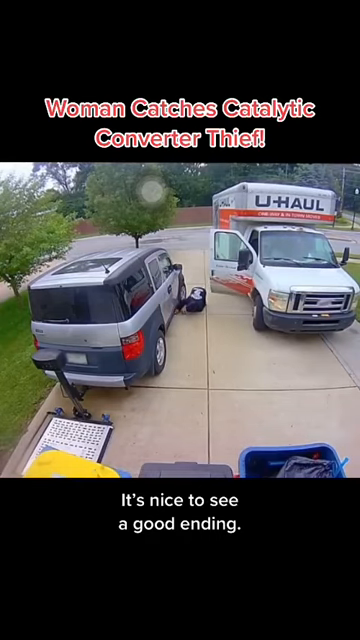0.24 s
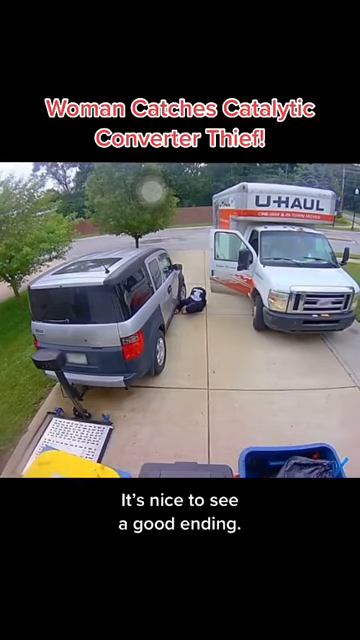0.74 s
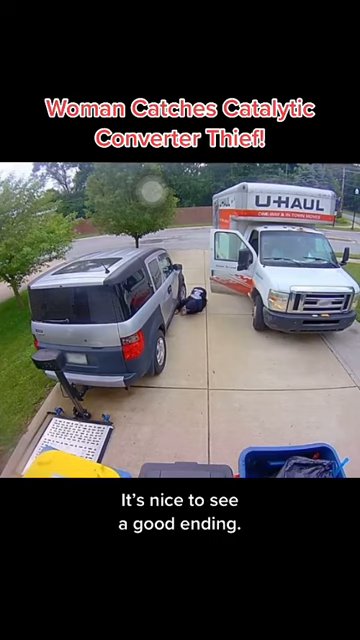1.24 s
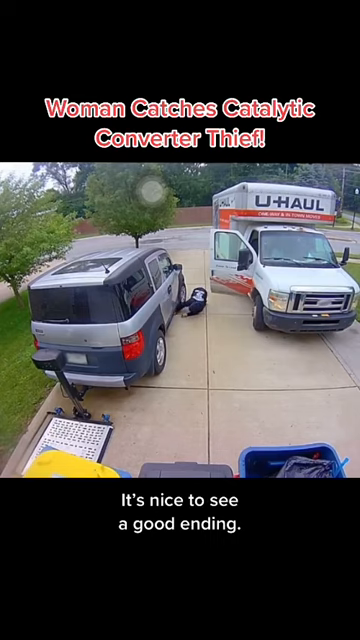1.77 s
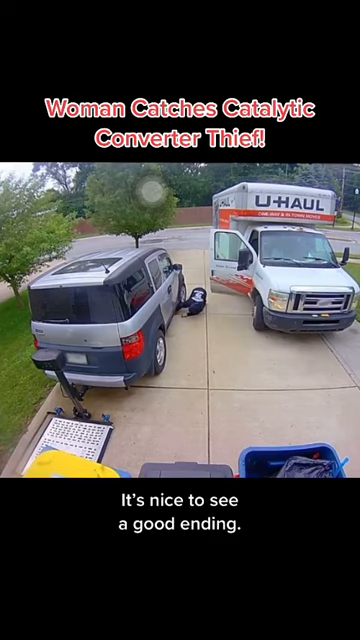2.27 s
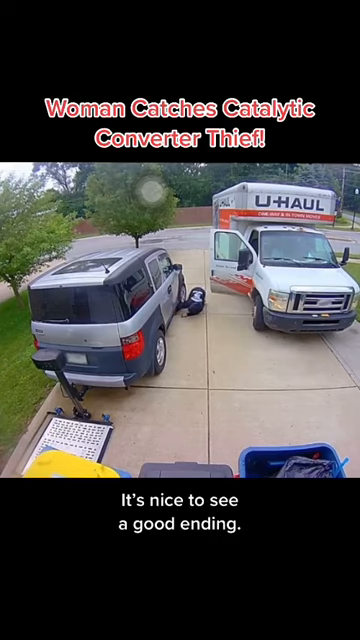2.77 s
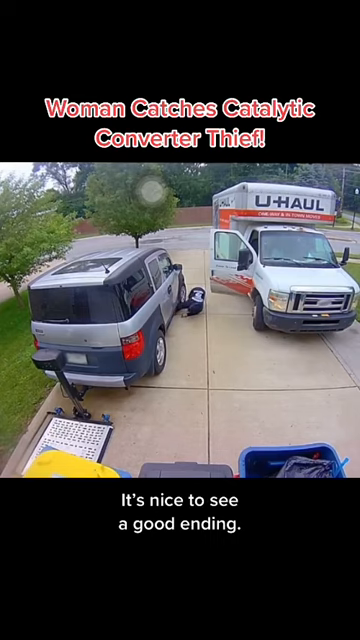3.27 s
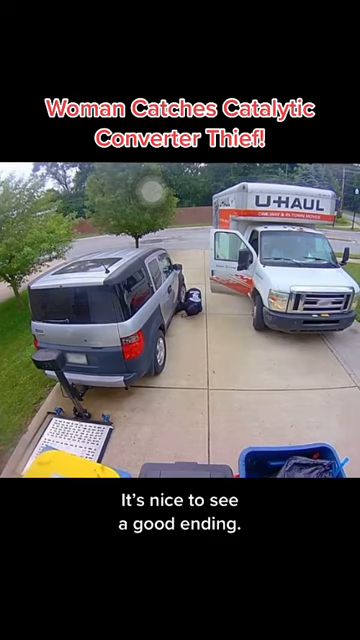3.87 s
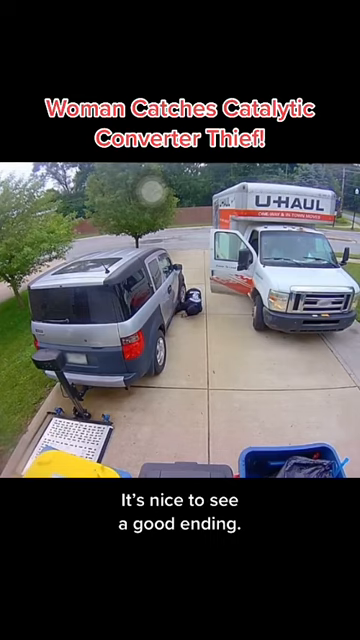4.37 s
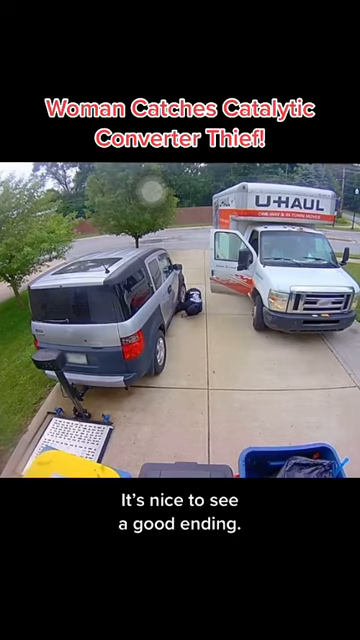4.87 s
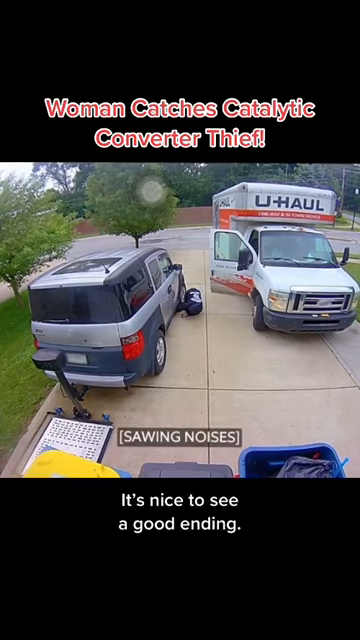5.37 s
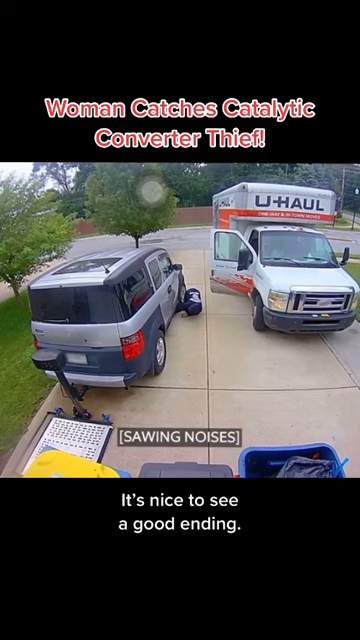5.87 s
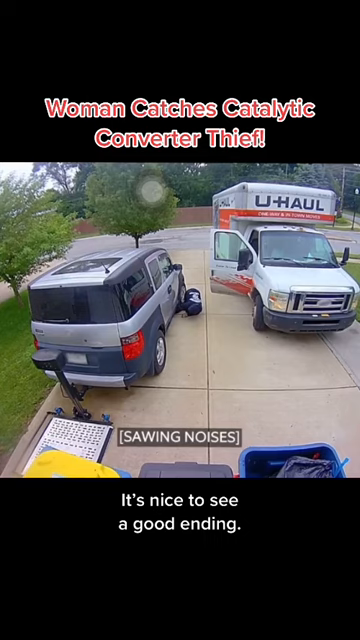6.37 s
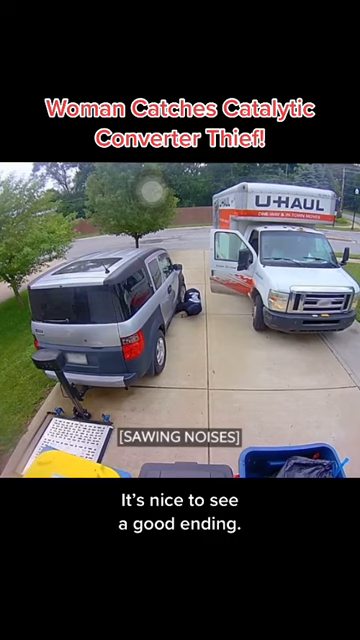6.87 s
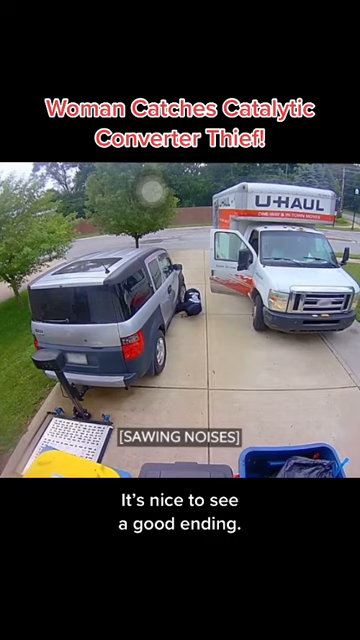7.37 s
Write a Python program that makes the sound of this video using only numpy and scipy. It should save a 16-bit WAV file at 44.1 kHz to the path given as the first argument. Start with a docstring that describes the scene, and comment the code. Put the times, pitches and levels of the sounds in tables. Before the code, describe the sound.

A small outdoor camera, set back along a driveway, hears dull low rumble with muffled treble. From 0 to about 2.1 s there are soft, low bumps and little rubbing swishes, busiest between 0.7 and 2 s. Then just open air, until around 3.4 s the rumble thins and a low, wavering engine-like hum sets in. At 4.55 s a blade slides onto metal with two faint gritty scrapes and tiny squeaks. At 5 s a reciprocating saw starts and quickly speeds up, with a few dull bumps, becoming much louder: rapid tearing rasp, metallic ringing and irregular shrill squeals as the blade binds. Around 6.3 s the load drops to a lighter rattle with knocks, squeaks and a thin rising whine. From 6.65 s it bites again, strongest near 7.0 to 7.2 s, then loosens into slapping knocks and fading rasp until 7.6 s.

```python
"""Soft bumps and swishes over a steady rumble; the rumble thins as a low engine-like hum sets in, then a saw
cuts a car's exhaust pipe. Bumps are damped resonances, swishes coloured noise. The reciprocating saw's rasp is
random chips pushed by each stroke; its squeals are sagging tones where the blade binds. Impulse responses of
ringing metal colour the saw; a small security camera up the driveway rounds the peaks and cuts the treble."""
import sys
import numpy as np
from scipy import signal
from scipy.fft import rfft, irfft, next_fast_len
from scipy.io import wavfile
from scipy.ndimage import uniform_filter1d

SR = 44100
rng = np.random.default_rng(int(sys.argv[2]) if len(sys.argv) > 2 else 0)


def wav_out(sig):
    """Save sig, one row per channel (or a flat mono array), as 16-bit PCM at SR to the path in sys.argv[1]."""
    wavfile.write(sys.argv[1], SR, np.round(np.clip(np.atleast_2d(sig).T, -1, 1) * 32767).astype(np.int16))


N = 336924
TIME = np.arange(N) / SR
CUT_START_S = 4.98


def undb(db):
    """Decibels to gain."""
    return 10 ** (np.asarray(db) / 20)


def unit(x):
    """Scale to rms 1."""
    return x / np.sqrt(np.mean(x ** 2))


def curve(rows):
    """Table columns, joined by straight lines in time."""
    s, *columns = np.transpose(rows)
    return [np.interp(TIME, s, c) for c in columns]


def walk(rate_hz):
    """Smooth chance with a spread near 1: random points at rate_hz, joined by lines."""
    points = rng.standard_normal(N // 10)
    return 1.2 * np.interp(TIME * rate_hz, np.arange(len(points)), points)


def colour(x, points):
    """Shape a spectrum by (f/Hz, gain/dB) points on a log frequency axis."""
    hz, db = np.transpose(points)
    size = next_fast_len(len(x) + 4096)
    f = np.maximum(np.fft.rfftfreq(size, 1 / SR), 1)
    gain = undb(np.interp(np.log(f), np.log(hz), db))
    return irfft(rfft(x, size) * gain, size)[:len(x)]


def band(x, lo_hz, hi_hz):
    """Steep band-pass."""
    return signal.sosfilt(signal.butter(4, [lo_hz, hi_hz], "band", fs=SR, output="sos"), x)


def add(out, s, x):
    """Mix a short sound in at s seconds."""
    i = max(int(s * SR), 0)
    out[i:i + len(x)] += x[:N - i]


def tone(hz):
    """Sine that follows a pitch curve."""
    return np.sin(2 * np.pi * np.cumsum(hz) / SR)


def wavering(hz, wander, rough_db):
    """Rough, unsteady tone with rms 1."""
    return unit(tone(hz * (1 + wander * walk(300))) * undb(rough_db * walk(120)))


def burst(push, space, db):
    """A short push rings the metal; db is the rms level of its strongest 14 ms."""
    x = signal.fftconvolve(push, space)[:len(push)]
    return x * undb(db) / np.sqrt(uniform_filter1d(x ** 2, SR // 70).max())


# steady background rumble before the hum: f/Hz, gain/dB
AIR_EARLY_COLOUR = [(25, -21), (90, -3.5), (380, -3.5), (520, -6.5), (880, -18), (1200, -21), (1750, -17.5),
                    (2600, -19.5), (2800, -26.5), (3850, -26), (4150, -19), (5600, -25.5), (7600, -28.5),
                    (8600, -37.5)]
# outdoor air with the hum: f/Hz, gain/dB
AIR_LATE_COLOUR = [(25, -33), (85, -14.5), (150, -7.5), (215, -6), (330, -1.5), (480, -3), (630, -13),
                   (750, -11), (900, -20), (1700, -17.5), (4500, -21), (6000, -20.5), (7600, -26),
                   (8600, -34)]
# hum partials: f/Hz, mean level/dB
HUM_PARTIALS = [(87, -67), (145.3, -55.5), (176, -58.5), (290.7, -60.5), (376.8, -61.5)]
AIR_EARLY_DB, AIR_LATE_DB = -46.5, -50
HUM_START_S, AIR_FADE_S = 3.406, 0.19  # fade is centred on the start


def background():
    """Coloured-noise rumble that thins out as a wavering hum of sine partials sets in."""
    late = np.clip((TIME - HUM_START_S) / AIR_FADE_S + .5, 0, 1)
    before = unit(colour(rng.standard_normal(N), AIR_EARLY_COLOUR)) * undb(AIR_EARLY_DB)
    after = unit(colour(rng.standard_normal(N), AIR_LATE_COLOUR)) * undb(AIR_LATE_DB)
    hum = np.zeros(N)
    for hz, db in HUM_PARTIALS:
        level = undb(db + 2 * walk(7.8)) * np.sqrt(2)
        hum += level * np.sin(2 * np.pi * hz * TIME + 1.6 * walk(10))
    mix = np.sqrt(1 - late) * before + np.sqrt(late) * (after + hum)
    return mix * undb(.5 * walk(4.53))


# dull bumps and short blips: t/s, level/dB, f/Hz, length scale/s, glide/(octaves per length)
BUMP_ROWS = [(0.005, -42.5, 990, 0.015, 0.029), (.715, -43, 463, 0.037, 0.019),
             (0.775, -37, 412, 0.021, -0.16), (0.794, -31, 384, 0.027, .1), (0.828, -32, 268, 0.015, 0.046),
             (0.833, -32.5, 437, 0.025, 0.11), (.882, -47, 790, 0.01, -0.12),
             (0.896, -30.5, 268, 0.016, 0.17), (0.911, -38.5, 906, 0.013, 0.046),
             (0.917, -32.5, 374, 0.021, 0.075), (1.014, -44, 863, 0.01, -0.22), (1.063, -53, 840, 0.017, 0),
             (1.075, -40.5, 163, 0.037, 0.037), (1.119, -45.5, 156, 0.029, 0),
             (1.242, -43.5, 235, 0.038, 0), (1.314, -29.5, 369, 0.025, 0.12),
             (1.332, -32, 834, 0.01, 0.035), (1.345, -37, 398, 0.042, 0.12),
             (1.405, -34.5, 276, 0.028, 0.16), (1.592, -36, 374, 0.036, -0.2),
             (1.62, -27, 280, 0.023, -0.079), (1.745, -42, 225, .018, 0.02), (1.839, -36, 388, 0.044, 0.11),
             (2.054, -34.5, 511, 0.047, -0.083), (5.2, -38.5, 185.4, 0.083, 0), (5.22, -47.5, 90, 0.061, 0),
             (5.221, -33, 345, 0.052, 0.065), (5.286, -29.5, 392, 0.019, 0.14),
             (5.336, -28.5, 402, 0.015, 0), (5.38, -36.5, 444, 0.038, -0.065),
             (5.49, -43, 151.5, 0.049, 0.027), (5.6, -35.5, 309.5, 0.052, -0.014),
             (5.663, -37.5, 441, 0.068, 0.037), (7.199, -34.5, 483, 0.074, 0.0044)]


def bumps(spread=0.156):
    """Soft pushes on three close, quickly damped resonances; the high ones are nearly pure blips."""
    out, t = np.zeros(N), TIME[:SR // 3]
    for s, db, hz, length, glide in BUMP_ROWS:
        age = t / max(length, .005)
        push = (2 * age) ** 2 * np.exp(2 - 4 * age)
        width = spread * min(1, 380 / hz) ** 3
        bent_s = np.cumsum(2 ** (glide * (np.minimum(age, 2) - .5))) / SR  # time warped by the glide
        ring = 0
        for side, size in ((-0.916, 0.45), (0.154, 0.65), (1.0, 0.31)):
            mode_hz = hz * (1 + width * (side + 0.211 * rng.standard_normal()))
            ring = ring + size * np.sin(2 * np.pi * (mode_hz * bent_s + rng.random()))
        x = push * ring
        add(out, s, x * undb(db) * np.linalg.norm(push) / np.linalg.norm(x))
    return out


def swells(rows, skirt=1.3):
    """Rubbing envelope: each movement swells to its peak and dies away as fast."""
    power = 0
    for s, db, length in rows:
        shape = np.exp(-np.abs((TIME - s) / (0.85 * length)) ** skirt)
        power = power + (undb(db) * shape) ** 2
    return np.sqrt(power)


def scrape(rubs, points, rough_db):
    """Rubbing noise: coloured, uneven in level, swelling with each movement."""
    return unit(colour(rng.standard_normal(N) * undb(rough_db * walk(150)), points)) * swells(rubs)


# soft swishes: peak t/s, level/dB, length scale/s
SWISH_ROWS = [(.02, -49, 0.17), (.76, -41, 0.11), (1.05, -50, 0.041), (1.19, -49, 0.047), (1.3, -45, 0.076),
              (1.334, -32, 0.016), (1.63, -44, 0.041), (1.74, -49.5, 0.18), (1.86, -52, 0.042),
              (1.96, -51, 0.035), (2.07, -44, 0.058)]
# swish spectrum: f/Hz, gain/dB
SWISH_SPECTRUM = [(60, -28), (150, -2), (400, 6), (650, -8.5), (1200, -24), (3000, -27), (3400, -17),
                  (3700, -25), (4450, -20), (4800, -0.5), (5100, -2), (5350, -10), (5750, -9), (6100, -28),
                  (8000, -36)]


def swishes():
    """Soft rubbing movements of uneven noise."""
    return scrape(SWISH_ROWS, SWISH_SPECTRUM, rough_db=2.6)


# metal of pipe and underbody: f/Hz, width/Hz, relative level/dB
PIPE_MODES = [(378, 20, -14), (470, 22, -9), (650, 60, -13), (1328, 22, -3), (1398, 18, 3), (1455, 18, -7),
              (1535, 14, 4), (1577, 18, -4), (1628, 18, 3), (1683, 20, -3), (1780, 26, -4), (1878, 30, 0),
              (2365, 30, -8), (2487, 24, -4), (2694, 28, -1), (2870, 22, 0), (3152, 22, 4), (3194, 20, -4),
              (3298, 34, -2), (3479, 24, 3.5), (3565, 32, -2), (3795, 30, -7), (4042, 30, -7),
              (4172, 24, 0), (4310, 30, -7), (4640, 26, -6), (4920, 26, -10), (5190, 24, -2),
              (5390, 26, -4), (5720, 28, -6), (6907, 22, 0), (7150, 40, -6)]
# blade running loose: f/Hz, width/Hz, relative level/dB
LOOSE_BLADE_MODES = [(635, 46, -7), (1540, 54, -5.5), (1690, 36, 1), (1805, 48, -1.5), (2300, 80, -1.5),
                     (2460, 39, -2), (3470, 130, 2), (4200, 46, -6), (5300, 94, -7), (7020, 90, -2.5)]


def underbody(modes, ring_db, tail_db, t60):
    """Impulse response: direct sound, ringing metal, short tail scattered between car and ground."""
    t = TIME[:SR // 4]
    h = np.zeros(len(t))
    for hz, width_hz, db in modes:
        size = undb(ring_db + db) * 2 * np.pi * width_hz / SR
        h += size * np.exp(-np.pi * width_hz * t) * np.cos(2 * np.pi * hz * t)
    h[0] += 1
    tail = rng.standard_normal(len(t)) * np.exp(-np.log(1000) * t / t60) * np.minimum(t / 0.0023, 1)
    return h + undb(tail_db) * tail / np.linalg.norm(tail)


# blade squeaks as it slides: t/s, f/Hz, level/dB, length/s
SQUEAK_ROWS = [(4.56, 1720, -45.5, 0.028), (4.565, 2308, -52, .02), (4.585, 5170, -51, .035),
               (4.63, 2210, -50, .03), (4.638, 1598, -51, .03), (4.573, 4600, -52, .03),
               (4.64, 4540, -54, .04), (4.812, 5270, -64, .03), (6.424, 2310, -33, 0.029),
               (6.427, 1730, -32.5, 0.028), (6.515, 5030, -30, .03), (6.517, 3220, -32, 0.035),
               (6.533, 4450, -39, 0.023), (6.541, 1647, -34, 0.034), (6.579, 3400, -36, 0.031),
               (6.62, 1730, -38, 0.027), (6.642, 5380, -38, 0.046), (7.026, 4100, -24, 0.02),
               (7.097, 4540, -25, .022), (7.123, 4000, -23, 0.011), (7.174, 3630, -32, 0.046),
               (7.188, 3430, -31, 0.031), (7.278, 4200, -33, 0.022), (7.313, 4170, -28, 0.028),
               (7.362, 4270, -37, 0.028), (7.405, 2470, -36, 0.043), (7.513, 2480, -33, 0.018),
               (7.519, 4330, -35, 0.021), (7.55, 2440, -40, 0.051)]


def squeaks(rows, space, bend=0.027, rough=.013):
    """Short sliding tones that swell, bend up or down and leave a brief ring."""
    out, shake = np.zeros(N), walk(500)
    for (s, hz, db, length), (way, place) in zip(rows, rng.random((len(rows), 2))):
        age = np.linspace(0, 1, int(max(length, .004) * SR))
        wander = rough * shake[int(place * N / 2):][:len(age)]
        pitch = hz * (1 + bend * (2 * way - 1) * (2 * age - 1) + wander)
        add(out, s, undb(db) * np.sqrt(2) * np.sin(np.pi * age) * tone(pitch))
    return signal.fftconvolve(out, space / np.linalg.norm(space))[:N]


# blade set against the pipe: peak t/s, level/dB before trims, length scale/s
TOUCH_ROWS = [(4.57, -43.5, 0.07), (4.652, -44.5, 0.048), (4.73, -56.5, 0.21)]
# its scrape spectrum: f/Hz, gain/dB
TOUCH_SPECTRUM = [(450, -41), (720, -1.5), (950, -29), (1220, -25), (1300, -14), (1610, 5), (1990, -18),
                  (2210, -2), (2630, -9), (3950, -17), (4510, -13), (5270, -15), (6720, -24), (8000, -24.5),
                  (10400, -62), (17600, -120)]
# its blade tones: f/Hz, relative level/dB
BLADE_TONES = [(1660, -6), (2250, -11), (4610, -15)]


def touch(tones_db=-8, scrape_db=-3.0):
    """The blade slides onto the pipe in two gritty pushes and a fainter third, and sings faintly."""
    tones = unit(sum(undb(db) * wavering(hz, wander=90 / hz, rough_db=4) for hz, db in BLADE_TONES))
    grit = scrape(TOUCH_ROWS, TOUCH_SPECTRUM, rough_db=1.5)
    return tones * swells(TOUCH_ROWS) * undb(tones_db) + undb(scrape_db) * grit


# saw speed before wander: t/s, stroke rate/Hz
SPEED_CURVE = [(4.98, 18), (5.15, 37), (5.5, 46.3), (7.15, 38.4), (7.3, 32), (7.64, 36)]


def saw_strokes():
    """Running stroke count of the saw, its speed wandering slightly."""
    return np.cumsum(curve(SPEED_CURVE)[0] * (1 + 0.0385 * walk(12))) / SR


# the cut, before trims: t/s, treble hiss level/dB, pipe midrange level/dB, saw-body rattle level/dB
CUT_CURVE = [(4.98, -90, -60, -54.5), (5.05, -47, -42.5, -42), (5.09, -33, -38, -41),
             (5.16, -31, -31.5, -37), (5.37, -25.5, -28.5, -34.5), (5.51, -28, -29.5, -37),
             (5.75, -25, -26.5, -35.5), (6.23, -28, -29, -38.5), (6.3, -35, -37.5, -38.5),
             (6.39, -40, -40, -44), (6.5, -36, -37.5, -44), (6.66, -36, -36.5, -41.5),
             (6.68, -30.5, -29, -36.5), (6.86, -27, -30.5, -38.5), (6.92, -35, -37, -42.5),
             (7.12, -27, -27.5, -38.5), (7.16, -19.5, -32, -34), (7.22, -25, -29, -31),
             (7.27, -26.5, -33.5, -39), (7.39, -35.5, -39, -41.5), (7.51, -38, -37.5, -38.5),
             (7.64, -41, -41, -48)]
# rasp spectrum: f/Hz, gain/dB
RASP_SPECTRUM = [(60, -23.5), (140, -11.5), (300, -7), (480, -4), (700, 1.5), (900, -7), (1200, -3.5),
                 (1600, 5.5), (1880, 7.5), (2050, 5), (2400, 9), (3400, 1), (5900, -2.5), (6350, -4),
                 (6600, -14.5), (7100, -5.5), (7500, -17.5), (7900, -13), (8300, -43)]
LOOSE_BELOW_DB, LOOSE_RANGE_DB = -30, 7  # blade ring takes over from pipe as the hiss curve falls below


def rasp(strokes, space, loose_space, grain_db=2.5, stroke_depth=0.17,
         ring_db=-0.2, rattle_db=-1, hiss_db=-2.1, uneven_db=1.5):
    """Teeth tear uneven chips, hardest in mid-stroke; a light cut is duller and rings the blade more."""
    treble_db, middle_db, body_db = curve(CUT_CURVE)
    chips = rng.standard_normal(N) * (rng.random(N) < .3)
    chips *= undb(grain_db * np.minimum(rng.exponential(size=N), 4))
    push = (1 + stroke_depth * np.cos(2 * np.pi * strokes)) * undb(uneven_db * walk(120))
    loose = np.clip((LOOSE_BELOW_DB - treble_db) / LOOSE_RANGE_DB, 0, 1)
    pipe = unit(colour(signal.fftconvolve(chips * push, space)[:N], RASP_SPECTRUM))
    blade = unit(colour(signal.fftconvolve(chips * push, loose_space)[:N], RASP_SPECTRUM))
    x = np.sqrt(1 - loose) * pipe + np.sqrt(loose) * blade
    low, middle, high = band(x, 40, 1164), band(x, 1083, 4270), band(x, 4090, 9200)
    # each level refers to a narrower band
    rattle = low / np.std(band(x, 474, 1003)) * undb(body_db + rattle_db)
    ring = middle / np.std(band(x, 1970, 2550)) * undb(middle_db + ring_db)
    hiss = high / np.std(band(x, 4090, 6130)) * undb(treble_db + hiss_db)
    return (rattle + ring + hiss) * np.clip((TIME - CUT_START_S) / 0.017, 0, 1)


CHIRPS_PER_S, CHIRP_LOW_HZ, CHIRP_HIGH_HZ, CHIRP_MEAN_S = 70, 1791, 5840, 0.019
CHIRP_DB, CHIRP_SCATTER_DB = -7, 3.5  # against the hiss curve


def chirps():
    """Chance chirps of single teeth, each at its own pitch; rows as in SQUEAK_ROWS."""
    cut_db, rows = curve(CUT_CURVE)[0], []
    for k, (when, pitch, size, length) in enumerate(rng.random((400, 4))):
        s = CUT_START_S + (k + 1 + 2 * when) / CHIRPS_PER_S
        if s < SQUEAL_ROWS[-1][0]:
            hz = CHIRP_LOW_HZ * (CHIRP_HIGH_HZ / CHIRP_LOW_HZ) ** pitch
            db = cut_db[int(s * SR)] + CHIRP_DB + CHIRP_SCATTER_DB * (2 * size - 1)
            rows.append((s, hz, db, CHIRP_MEAN_S * (.5 + length)))
    return rows


SWELL_S, SWELL_DB = 0.018, 1
UNCAUGHT_DB = -2.5


def catch_gain():
    """Gain of the cut: sinks until the first bind catches; swells slightly just before each hard bind."""
    ahead = np.array(SQUEAL_ROWS)[:, :1] - TIME
    to_first = np.clip((TIME - CUT_START_S) / (SQUEAL_ROWS[0][0] - CUT_START_S), 0, 1)
    skating = (ahead[0] > 0) * to_first
    swell = ((ahead > 0) * np.exp(-(ahead / SWELL_S) ** 2)).max(axis=0)
    return undb(SWELL_DB * swell + UNCAUGHT_DB * skating)


def flutter(dip_db=-2.0):
    """The level dips briefly every 12 ms, whatever the saw speed: a fine, steady flutter over the cut."""
    cycle = np.cos(np.pi * (TIME / .012 - .7)) ** 12
    return undb(dip_db * (cycle - cycle.mean()) * (TIME > CUT_START_S))


# upper blade tone in the heavy cut: t/s, f/Hz, level/dB
SING_CURVE = [(5.13, 3311, -33), (5.28, 3383, -24), (5.45, 3477, -29.5), (5.49, 3274, -37),
              (5.6, 3410, -26.5), (5.72, 3303, -39), (5.88, 3300, -29), (5.98, 3475, -21.5),
              (6.1, 3300, -28), (6.24, 3300, -42), (6.36, 3210, -61)]


def sing(strokes, space, swing=0.038, stroke_depth=0.43):
    """The blade's upper tone swells and swings in pitch with each stroke, a metallic edge on the rasp."""
    hz, db = curve(SING_CURVE)
    voice = wavering(hz * (1 + swing * np.sin(2 * np.pi * strokes)), wander=0.024, rough_db=2.5)
    grip = 1 + stroke_depth * np.cos(2 * np.pi * strokes)
    x = unit(signal.fftconvolve(voice * grip, space)[:N])
    return x * undb(db) * (TIME > SING_CURVE[0][0])


def chatter(strokes, space, low_hz=1590, swing=0.0694, wander=.05, onset_slope=0.87):
    """Once the teeth catch, the loaded blade sticks and slips; its pitch swings with every stroke."""
    cut_db = uniform_filter1d(curve(CUT_CURVE)[0], SR // 25)
    hz = low_hz * (1 + swing * np.sin(2 * np.pi * strokes) + wander * walk(300))
    phase = 2 * np.pi * np.cumsum(hz) / SR
    low = np.sin(phase) * undb(3.4 * walk(220))
    upper = undb(7.5 * np.tanh(walk(200))) * np.sin(2.09 * phase)  # just above the octave
    grip = np.cos(np.pi * strokes) ** 2
    x = unit(signal.fftconvolve((low + upper) * grip, space)[:N])
    level_db = cut_db + onset_slope * (cut_db - cut_db.max())
    return x * undb(level_db) * (TIME > SQUEAL_ROWS[0][0])


# hard binds, levels before trims: t/s, low f/Hz, low level/dB, high f/Hz, high level/dB,
# tooth bite level/dB, length scale/s
SQUEAL_ROWS = [(5.139, 1572, -23, 3230, -25, -37, 0.015), (5.166, 1530, -25.5, 3270, -25.5, -27.5, 0.012),
               (5.194, 1903, -23, 3420, -26, -30, 0.024), (5.277, 1736, -22, 3365, -22, -28.5, 0.015),
               (5.298, 1490, -18.5, 3426, -15.5, -31, 0.016), (5.31, 1617, -19.5, 3140, -21, -42, 0.018),
               (5.345, 1586, -24, 3460, -22, -39, 0.016), (5.37, 1540, -21.5, 3174, -22.5, -23.5, 0.012),
               (5.391, 1660, -16.5, 3280, -21.5, -22, 0.011), (5.41, 1600, -28.5, 3520, -16.5, -33, 0.0167),
               (5.433, 1746, -29, 3564, -15.5, -43, 0.014), (5.519, 1526, -20, 3144, -20, -38, 0.018),
               (5.554, 1505, -17.5, 3275, -16.5, -26, 0.009), (5.567, 1610, -24, 3307, -19.5, -34, 0.012),
               (5.621, 1610, -19.5, 3510, -17.5, -23, 0.013), (5.652, 1435, -16.5, 3460, -25, -27.5, 0.016),
               (5.677, 1405, -16.5, 2800, -24, -25, 0.022), (5.749, 1509, -15, 3140, -16.5, -22, 0.017),
               (5.76, 1704, -22, 3170, -14.5, -34, 0.011), (5.796, 1580, -18.5, 3600, -29, -35, 0.0082),
               (5.806, 1690, -22, 3330, -13, -33.5, 0.0078), (5.821, 1596, -17, 3250, -20, -35, 0.013),
               (5.844, 1620, -30, 3690, -21, -38, 0.0067), (5.872, 1489, -15.5, 2694, -28, -28.5, 0.022),
               (5.897, 1520, -18.5, 3380, -17, -25.5, 0.024), (5.989, 1660, -33, 3380, -27, -24, 0.011),
               (6.035, 1827, -30, 3390, -19.5, -35, 0.02), (6.083, 1567, -21.5, 3280, -25.5, -32.5, 0.015),
               (6.136, 1456, -19.5, 3150, -20, -26.5, 0.023), (6.222, 1386, -22.5, 3410, -24, -42, 0.014),
               (6.66, 1520, -22.5, 3320, -26, -37, 0.019), (6.681, 1466, -17.5, 3435, -20, -27, 0.019),
               (6.701, 1577, -20, 3440, -24.5, -42, 0.021), (6.752, 1530, -20.5, 3410, -20.5, -23, 0.016),
               (6.797, 1500, -21.5, 3520, -21, -31, 0.016), (6.817, 1636, -30, 3180, -21, -29, 0.027),
               (6.886, 1626, -22, 3170, -28, -35, 0.011), (6.935, 1518, -20, 3240, -19, -22.5, 0.023),
               (6.98, 1569, -16, 3194, -21.5, -25.5, 0.02), (7.027, 1574, -14, 3210, -17.5, -17.5, 0.018),
               (7.075, 1487, -15, 3315, -18.5, -24, 0.021), (7.102, 1360, -26, 2660, -28, -23, 0.013),
               (7.126, 1386, -17.5, 2680, -16, -20, 0.009), (7.139, 1357, -17, 2706, -17, -23, 0.011),
               (7.157, 1394, -23, 3600, -29, -17, 0.008)]
# higher tones set off by the teeth: f/Hz, level against the untrimmed bite/dB
BITE_TONE_ROWS = [(4070, -2.5), (4650, -10), (5450, -10.5), (6950, -15)]
# bite noise spectrum: f/Hz, gain/dB
BITE_SPECTRUM = [(2200, -24.5), (3400, -9), (5900, -1.5), (6600, -11.5), (7100, -13), (7500, -8),
                 (9000, -29)]
# overtones of the low tone: multiple, level against the untrimmed low tone at full bite/dB
OVERTONE_ROWS = [(3, -12), (5, -15)]
FULL_BITE_DB, OVERTONE_SLOPE, OVERTONE_TOP_HZ = -23, 1.4, 7300  # overtones fade below full bite
BIND_ATTACK_S = .0036


def squeals(binds, space, sag=0.0499, rough=0.031, high_rough=.013,
            low_db=-.5, high_db=-1, bite_db=-8, hang=0.3):
    """The blade binds: teeth bite, tones start sharply, sag as it slows and hang on briefly."""
    out, t = np.zeros(N), TIME[:SR // 6]
    shake, grit = walk(700), unit(colour(rng.standard_normal(N), BITE_SPECTRUM))
    all_starts = rng.integers(N - len(t), size=(len(binds), 8))
    for (s, hz1, db1, hz2, db2, db3, length), starts in zip(binds, all_starts):
        age = t / max(length, .004)
        grip = np.minimum(t / BIND_ATTACK_S, 1) * (np.exp(-2 * age ** 2) + hang * np.exp(-age / 2))
        add(out, s, burst(grip * grit[int(s * SR):][:len(t)], space, db3 + bite_db))
        tones = [(hz1, db1 + low_db, rough), (hz2, db2 + high_db, rough)]
        tones += [(hz, db3 + db, high_rough) for hz, db in BITE_TONE_ROWS]
        fade_db = OVERTONE_SLOPE * min(db3 - FULL_BITE_DB, 0)
        for k, db in OVERTONE_ROWS:
            if k * hz1 < OVERTONE_TOP_HZ:
                tones.append((k * hz1, db1 + db + fade_db, high_rough / 2))
        for (hz, db, wander), start in zip(tones, starts):
            pitch = hz * (1 + sag * (.35 - np.minimum(age, 1)) + wander * shake[start:][:len(t)])
            add(out, s, burst(grip * tone(pitch), space, db))
    return out


BINDS_PER_S, LIGHT_UNTIL_S, BIND_S = 19, 6.2, 0.026
BIND_LOW_HZ, BIND_HIGH_HZ, BIND_PITCH_SPREAD = 1613, 3360, 0.031
BIND_LOW_DB, BIND_HIGH_DB, BIND_BITE_DB, BIND_SCATTER_DB = 5, 2, -4, 1.5  # against load, before trims
BIND_LOAD_SLOPE = 0.56  # binds fade faster than the cut as load comes off


def light_binds():
    """Jittered binds between the hard ones, as strong as the cut is heavy; rows as in SQUEAL_ROWS."""
    cut_db, hard_s, rows = curve(CUT_CURVE)[0], np.array(SQUEAL_ROWS)[:, 0], []
    load_db = cut_db + BIND_LOAD_SLOPE * (cut_db - cut_db.max())
    for k, (when, low, high, size_low, size_high) in enumerate(rng.standard_normal((90, 5))):
        s = hard_s[0] + (k + 1 + 0.22 * when) / BINDS_PER_S
        db = np.interp(s, TIME, load_db)
        if s < LIGHT_UNTIL_S and np.abs(s - hard_s).min() > .022:
            low_hz = BIND_LOW_HZ * (1 + BIND_PITCH_SPREAD * low)
            high_hz = BIND_HIGH_HZ * (1 + BIND_PITCH_SPREAD * high)
            low_db = db + BIND_LOW_DB + BIND_SCATTER_DB * size_low
            high_db = db + BIND_HIGH_DB + BIND_SCATTER_DB * size_high
            rows.append((s, low_hz, low_db, high_hz, high_db, db + BIND_BITE_DB, BIND_S))
    return rows


# thin whine while the blade runs light: t/s, f/Hz, level/dB
WHINE_CURVE = [(6.42, 4800, -69), (6.53, 5060, -38), (6.58, 5400, -44), (6.65, 5540, -34), (6.8, 5340, -47),
               (6.9, 5400, -71)]


def whine():
    """A thin wavering tone climbs as the load comes off the saw, then eases back."""
    hz, db = curve(WHINE_CURVE)
    return wavering(hz, wander=0.024, rough_db=1.0) * undb(db) * (TIME > WHINE_CURVE[0][0])


# loose blade in the slot: t/s, level/dB before trim, ring centre f/Hz
KNOCK_ROWS = [(6.449, -29, 1770), (6.519, -41, 4600), (6.546, -35, 2280), (7.189, -20, 3600),
              (7.282, -25.5, 3950), (7.318, -33, 4400), (7.318, -30, 1780), (7.347, -33, 1630),
              (7.386, -25.5, 1640)]
KNOCK_DECAY_S, KNOCK_OCTAVES = 0.0076, 0.2  # contact decay, half-width of the ring


def knocks(space, knock_db=-1):
    """Under little load the blade slaps the slot's sides: decaying noise round one pitch rings the metal."""
    out, t = np.zeros(N), TIME[:SR // 6]
    f = np.geomspace(300, 9000, 40)
    for (s, db, hz), grit in zip(KNOCK_ROWS, rng.standard_normal((len(KNOCK_ROWS), len(t)))):
        gain_db = -10 * np.log10(1 + (np.log2(f / hz) / KNOCK_OCTAVES) ** 4)
        push = colour(grit, np.column_stack([f, gain_db])) * np.exp(-t / KNOCK_DECAY_S)
        add(out, s, burst(push, space, db + knock_db))
    return out


ECHO_S, ECHO_DB = .01432, -9


def scene():
    """Soft bumps and swishes, a first touch of the blade, then the cut."""
    strokes = saw_strokes()
    space = underbody(PIPE_MODES, ring_db=8.5, tail_db=-0.5, t60=0.28)
    near = underbody(PIPE_MODES, ring_db=0.0, tail_db=-2, t60=0.2)  # blade is more in the open than the pipe
    add(near, ECHO_S, undb(ECHO_DB) * near[:SR // 6])  # the van's flank throws the sound back
    loose = underbody(LOOSE_BLADE_MODES, ring_db=3.0, tail_db=-3, t60=0.34)
    open_air = underbody(PIPE_MODES, ring_db=-11, tail_db=-7, t60=0.16)
    handling = bumps() + swishes() + touch()
    cutting = rasp(strokes, space, loose) + sing(strokes, space) + chatter(strokes, space)
    saw = cutting * catch_gain() + squeaks(SQUEAK_ROWS + chirps(), open_air)
    saw += squeals(SQUEAL_ROWS + light_binds(), near) + whine() + knocks(near)
    return (background() + handling + saw * flutter())[None]


def record(dry, top_hz=8500):
    """The camera rounds the highest peaks and passes next to nothing above its narrow band."""
    rounded = np.tanh(.7 * dry) / .7
    return signal.sosfilt(signal.ellip(8, .2, 70, top_hz, fs=SR, output="sos"), rounded)


dry = scene()
out = record(dry)
wav_out(out)
```